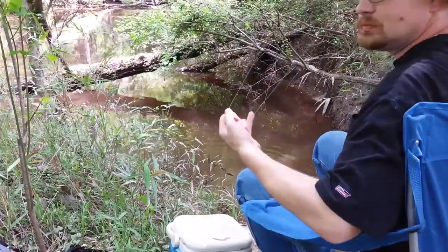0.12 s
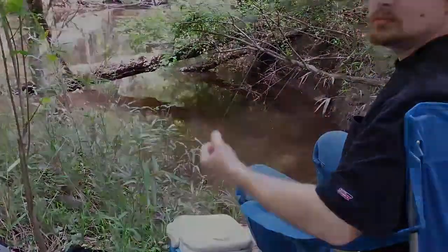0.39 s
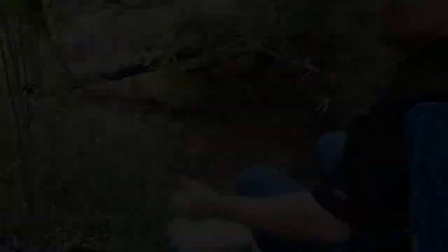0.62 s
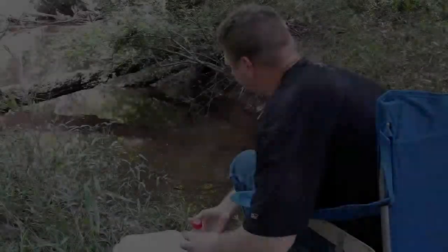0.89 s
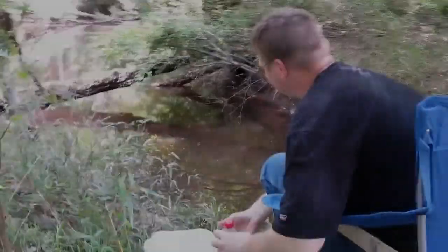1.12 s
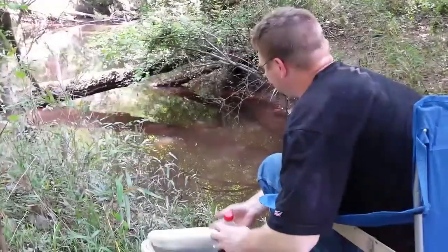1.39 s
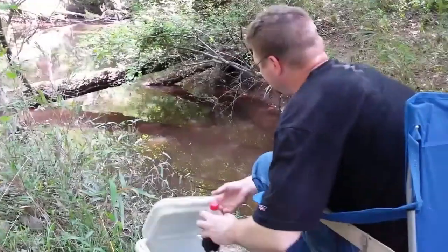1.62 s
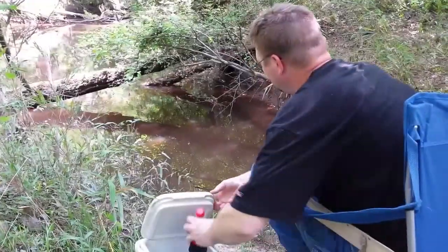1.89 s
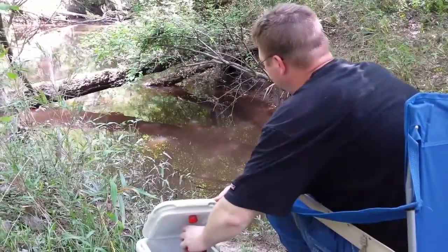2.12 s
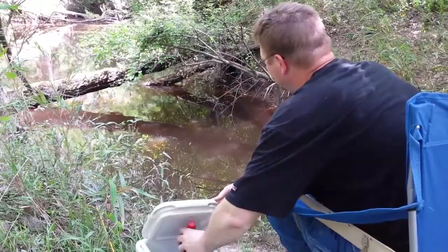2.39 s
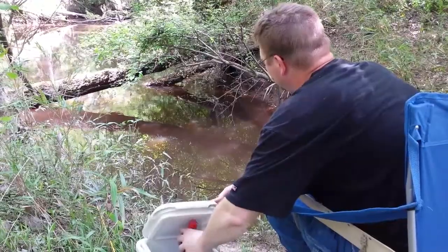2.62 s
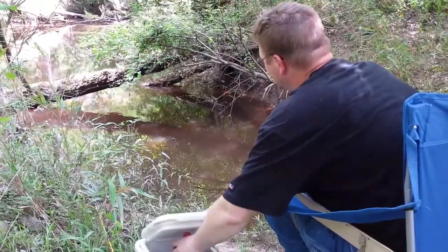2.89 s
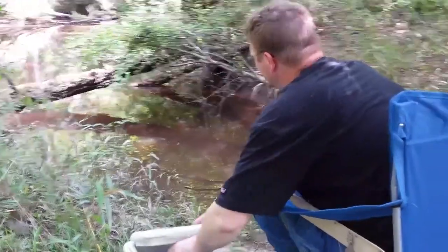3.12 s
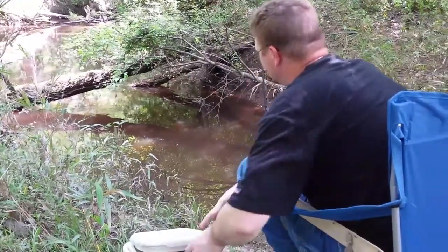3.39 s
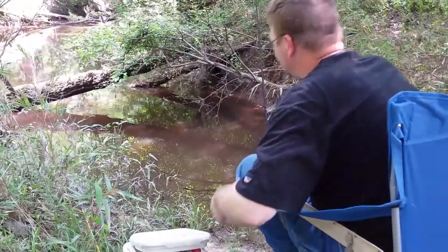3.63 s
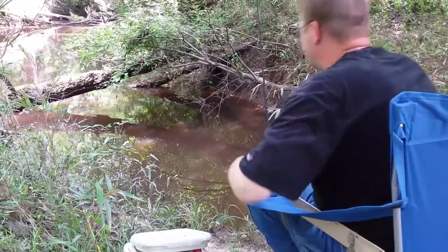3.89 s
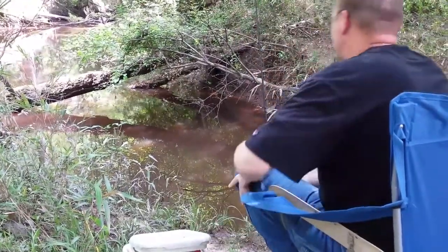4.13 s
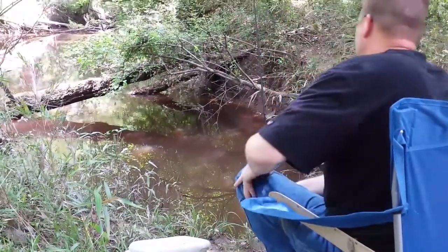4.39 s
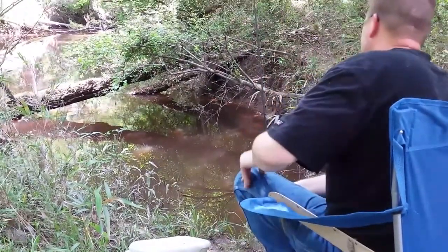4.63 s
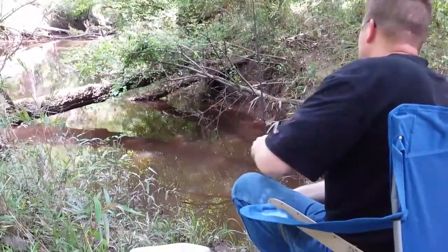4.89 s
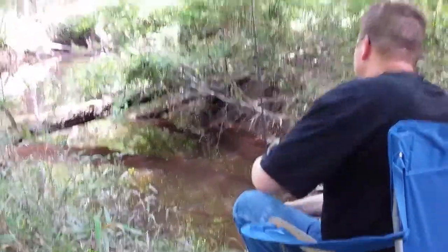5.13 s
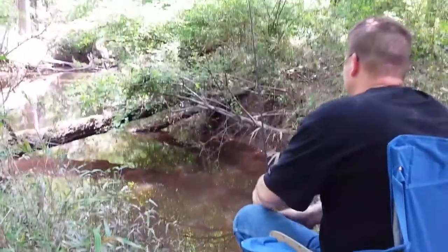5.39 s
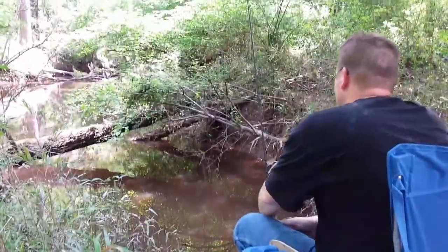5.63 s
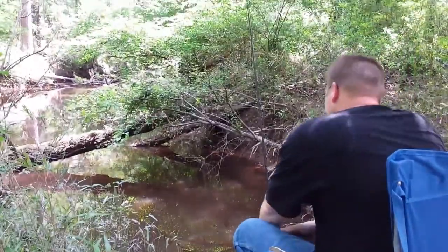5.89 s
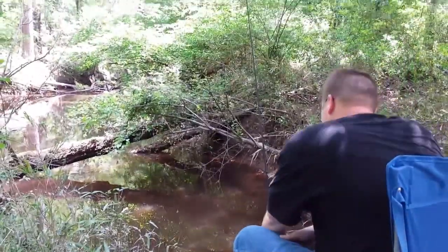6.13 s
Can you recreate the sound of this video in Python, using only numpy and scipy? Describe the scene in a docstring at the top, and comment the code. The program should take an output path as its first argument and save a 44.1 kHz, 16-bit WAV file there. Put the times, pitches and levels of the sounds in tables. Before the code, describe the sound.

Quiet woodland creek bank, heard close on a handheld microphone. Cloth hisses softly and a seat thumps dully, then a hand stirs loose tackle in a hard plastic box: sharp clacks, rattling, bright jingle and loud snaps as the lid closes. Afterwards fabric rustles, a bird gives quick sliding chirps echoing among trees, and soft finger bumps patter against the microphone.

```python
"""Tackle box on a creek bank

In the woods a seated angler rummages in a plastic tackle box and snaps it shut: short bursts of pushes ring its parts.
Cloth slides on a folding chair (shaped noise), the seat thumps and fingers knock on the handheld camera (ringing modes).
A bird sings quick glides (gliding sine tones) that ring among the trees (scattered, fading echoes).
Under it all lie the air of the woods, a low rumble (both noise) and a faint wavering hum (a drifting sine)."""
import sys
import numpy as np
from scipy import signal
from scipy.fft import rfft, irfft
from scipy.io import wavfile
from scipy.ndimage import uniform_filter1d

SR = 44100
rng = np.random.default_rng(int(sys.argv[2]) if len(sys.argv) > 2 else 0)


def output_pcm(signal):
    """Save a mono or channel-first signal as 16-bit PCM at the path in sys.argv[1].

    Samples are clipped to [-1, 1] before scaling.
    """
    pcm = np.clip(np.atleast_2d(signal).T, -1, 1) * 32767
    wavfile.write(sys.argv[1], SR, np.round(pcm).astype(np.int16))


def undo_db(level):
    """Turn decibels back into plain size, where 20 dB means ten times bigger."""
    steps = np.asarray(level, float) / 20
    return 10 ** steps


N = 276066  # samples in the scene


def evened(x):
    """Scales a sound to an rms of 1."""
    return x / np.sqrt(np.mean(x ** 2) + 1e-20)


def read(points, hz):
    """Reads a table of values over pitch, on a log-frequency axis."""
    f, value = np.transpose(points)
    return np.interp(np.log(hz + 1), np.log(f + 1), value)


def curve(rows):
    """Joins timed rows with straight lines: one array of samples per column."""
    s, *columns = np.transpose(rows)
    return [np.interp(np.arange(N) / SR, s, column) for column in columns]


# how alike noise is at the two microphone ports: f/Hz, likeness (1 = same, 0 = unrelated)
LIKENESS = [(60, 0.54), (180, 0.89), (550, 0.31), (1650, 0.019), (4970, 0.084), (15000, -0.2)]


def noise(shape, patchy_db):
    """Two-port noise of a given spectrum, with patches that drift in time and pitch."""
    frames, hz = N // 256 + 5, np.fft.rfftfreq(1024, 1 / SR)
    a, b, c, d, patches = rng.standard_normal((frames, 513, 5)).T
    patches = uniform_filter1d(patches, size=10, axis=0)
    patches = evened(uniform_filter1d(patches, size=8, axis=1))
    same = np.clip(read(LIKENESS, hz), -1, 1)[:, None]
    left = a + 1j * b
    right = same * left + np.sqrt(1 - same ** 2) * (c + 1j * d)
    spectrum = np.array([left, right]) * undo_db(read(shape, hz)[:, None] + patchy_db * patches)
    return evened(signal.istft(spectrum, nperseg=1024, noverlap=768)[1][:, :N])


def ring(pushes, modes):
    """Each mode, a sine that dies away, rings to its own train of pushes."""
    t = np.arange(6000) / SR
    out = np.zeros(pushes.shape[1])
    for push, (hz, db, t60) in zip(pushes, modes):
        tone = undo_db(db - 60 * t / t60) * np.sin(2 * np.pi * hz * t)
        out += signal.oaconvolve(push, tone)[:len(out)]
    return out


def struck(times, dbs, chatters, modes, rise):
    """A blow is dying contact chatter that gives each mode its share; soft contacts rise slowly."""
    out, t = np.zeros((len(modes), N + 2000)), np.arange(2000) / SR
    draws = rng.standard_normal((len(times), len(modes), 2000))
    hz, _, t60 = np.transpose(modes)[:, :, None]
    soft = int(rise * SR)
    for s, db, chatter, draw in zip(times, dbs, chatters, draws):
        burst = draw * np.exp(-t / max(chatter, 1e-4))
        burst = uniform_filter1d(burst, 1 + soft, origin=soft // 2, mode="constant")
        # how far the burst swings each mode
        turning = burst * undo_db(60 * t / t60) * np.exp(-2j * np.pi * hz * t)
        swing = abs(np.cumsum(turning, 1)) * undo_db(-60 * t / t60)
        burst /= swing.max(1, keepdims=True)  # every mode reaches its usual height
        peak = abs(ring(np.pad(burst, ((0, 0), (0, 500))), modes)).max()
        out[:, round(s * SR):][:, :2000] += undo_db(db) * burst / peak
    return ring(out[:, :N], modes)


def contacts(per_s, spread_db):
    """Contacts at random moments, many small and a few large."""
    sizes = undo_db(spread_db * np.minimum(rng.exponential(1, N), 4))
    return (rng.random(N) < per_s / SR) * sizes


def rattle(modes, per_s, spread_db, detune):
    """Loose contacts at four spots, each ringing a little off the others and dying sooner than a blow."""
    out = np.zeros(N)
    for shift in np.linspace(-1, 1, 4):
        hits = contacts(per_s, spread_db)
        spot = [(hz * (1 + detune * shift), db, 0.38 * t60) for hz, db, t60 in modes]
        out += ring(hits * rng.standard_normal((len(modes), N)), spot)
    return evened(out)


# how long echoes last among the trees: f/Hz, t60/s
TREE_ECHO = [(200, 0.058), (1500, 0.63), (4000, 0.68), (9000, 0.55)]


def trees(x):
    """Scattered echoes from trunks and bank, each band dying at its own speed."""
    taps = np.zeros((2, SR))
    at = np.arange(300, SR - 20, 20) + rng.integers(0, 20, (2, (SR - 301) // 20))
    np.put_along_axis(taps, at, rng.choice([-1., 1.], at.shape), 1)
    hz, t, z = signal.stft(taps, SR, nperseg=256)
    fade = undo_db(-60 * t / read(TREE_ECHO, hz)[:, None])
    tail = signal.istft(z * fade, SR, nperseg=256)[1]
    return signal.fftconvolve(x[None], tail / np.linalg.norm(tail[0]), axes=1)[:, :N]


def nearby(x, echo_db):
    """Ground, knees and chair give each port its own few early reflections."""
    taps = np.zeros((2, 500))
    np.put_along_axis(taps, rng.integers(20, 500, (2, 8)), rng.choice([-1., 1.], (2, 8)), 1)
    taps *= undo_db(echo_db - 12 * np.arange(500) / 500)  # later ones are softer
    return signal.oaconvolve(x[None], taps, axes=1)[:, :N]


def arrive(x, size):
    """The left port hears the sound this many samples late (early if negative)."""
    return np.array([np.roll(x, size), x])


def airborne(x, hz):
    """Small things radiate no deep bass: a high-pass filter."""
    return signal.sosfilt(signal.butter(3, hz, "high", fs=SR, output="sos"), x)


# tone colour of the air of the woods: f/Hz, level/dB (relative, per Hz)
WOODS_COLOUR = [(88, -19), (150, 1), (314, -4), (396, -22.5), (481, -19.5), (595, -14), (827, -13.5),
                (1700, -32), (2650, -9.5), (4480, -19), (12800, -19), (15500, -40.5)]


def woods():
    """The steady air of the woods: noise with strong drifting patches."""
    return undo_db(-70.5) * noise(WOODS_COLOUR, patchy_db=7.5)


# breeze and the holder's grip rumbling in the microphone: t/s, level/dB
RUMBLE_LEVEL = [(0.0, -63), (1.39, -61), (1.78, -66.5), (2.04, -66.5), (2.3, -53), (2.79, -60), (3.03, -56),
                (3.31, -52), (3.71, -63.5), (4.29, -65), (4.83, -58), (5.18, -54.5), (5.51, -61.5),
                (5.82, -62), (6.26, -64.5)]
# tone colour of that rumble: f/Hz, level/dB (relative, per Hz)
RUMBLE_COLOUR = [(20, -38), (40, -23), (80, 2.5), (130, -2), (200, -19.5), (350, -29.5)]


def rumble():
    """Breeze and grip shake the microphone: low noise that swells and sinks."""
    return undo_db(curve(RUMBLE_LEVEL)[0]) * noise(RUMBLE_COLOUR, patchy_db=-1.0)


# hiss of sliding cloth: t/s, level/dB
CLOTH_LEVEL = [(0.0, -67), (0.14, -65.5), (0.3, -58.5), (0.46, -57), (0.68, -61), (1.03, -58.5),
               (1.29, -63), (2.1, -73), (3.45, -64.5), (3.6, -71), (4.07, -74), (4.35, -65.5),
               (4.65, -56.5), (4.87, -62), (5.43, -60.5), (5.7, -70), (5.86, -61.5), (6.26, -74)]
# tone colour of the hiss: f/Hz, level/dB (relative, per Hz)
HISS_COLOUR = [(1470, -39.5), (2500, -15.5), (4330, -9), (5160, -9), (6490, -3.5), (9800, -14),
               (13900, -28.5), (14800, -26.5), (15500, -51)]
# tone colour of the duller drag: f/Hz, level/dB (relative, per Hz)
DRAG_COLOUR = [(88, -45), (150, -3.5), (475, -2), (516, -5.5), (595, -6), (2500, -12.5), (3250, -53),
               (5500, -120)]


def cloth():
    """Sliding fabric: noisy hiss, and a duller drag that follows it less steeply."""
    hiss_db = curve(CLOTH_LEVEL)[0]
    drag_db = -65.5 + 0.63 * (hiss_db + 60.5)  # 0.63 dB of drag per dB of hiss
    hiss = undo_db(hiss_db) * noise(HISS_COLOUR, patchy_db=1.5)
    return hiss + undo_db(drag_db) * noise(DRAG_COLOUR, patchy_db=3.0)


# blows on the box: t/s, body level/dB, tilt from wall to rim/dB, crack level/dB, contact chatter/s
# (blows() adjusts levels and chatter for each part)
BOX_BLOWS = [(0.0568, -58.5, -4, -65, 0.016), (0.3704, -62.5, -1.5, -46, 0.01),
             (0.7641, -64, 0, -44, 0.0039), (1.454, -54.5, -1, -49, 0.012),
             (2.1287, -43, -6.5, -41, 0.0064), (2.144, -38.5, -3, -37, 0.0084),
             (2.1744, -45.5, 4.3, -45, 0.012), (2.2325, -22, 0, -19, 0.0084),
             (2.2676, -41, -13, -36.5, 0.00067), (2.4167, -51.5, -11.5, -53, 0.0043),
             (2.726, -76, -5.5, -37.5, 0.0067), (2.7402, -44, 2.5, -35, 0.0039),
             (2.7562, -64, -3, -42.5, 0.0022), (2.8066, -24, 4, -24.5, 0.0061),
             (2.832, -43.5, -10.5, -25, 0.0097), (2.9186, -36.5, 11, -7, 0.0099),
             (2.9666, -37, 8.5, -9.5, 0.004), (2.9972, -42, 4.5, -36.5, 0.032),
             (3.086, -52.5, 5.5, -44.5, 0.0036), (3.1343, -33, 6.5, -27, 0.0018),
             (3.1443, -42, 3.5, -30.5, 0.0042), (3.1644, -23, 2, -9, 0.013), (3.33, -49, 12.5, -51, 0.017),
             (3.366, -48, 7, -29, 0.013), (3.3833, -53, -6.5, -53, 0.0041), (3.4092, -52, -14, -60, 0.0042),
             (3.477, -46, 3.5, -42.5, 0.0037), (3.8635, -75, 15, -57, 0.01),
             (5.4169, -51.5, 7, -34, 0.0042)]
# ringing of the box walls: f/Hz, level/dB (relative), t60/s
WALL_MODES = [(193.3, -5.5, 0.077), (263, -6.5, 0.17), (368, -2.5, 0.07), (447, -4.5, 0.12),
              (515, -9.5, 0.12)]
# ringing of the lid: f/Hz, level/dB (relative), t60/s
LID_MODES = [(680, -6, 0.055), (806, -0.5, 0.064), (956, 5, 0.025), (1145, 2.5, 0.029), (1315, -0.5, 0.027)]
# ringing of the rim: f/Hz, level/dB (relative), t60/s
RIM_MODES = [(1482, -9, 0.068), (1695, -9.5, 0.093), (1850, 5, 0.011), (1840, -1.5, 0.026),
             (2156, 0.5, 0.013), (2253, -2.5, 0.02), (2544, 0, 0.02), (2913, 1, 0.013), (3200, -10.5, 0.01),
             (3775, -10.5, .02)]
# bright ringing of the hard edges: f/Hz, level/dB (relative), t60/s
CRACK_MODES = [(4160, -18, 0.044), (4910, -12.5, 0.029), (5300, -6.5, 0.017), (5984, 9, 0.0053),
               (6540, 1, .008), (7200, -1.5, 0.014), (7895, 3, 0.016), (8390, -2, 0.0048),
               (9040, -12, .005), (10070, -19, .004), (13000, -32, .004)]


def blows():
    """Each blow rings walls, lid and rim, and its shorter chatter cracks the hard edges."""
    s, db, tilt_db, crack_db, chatter = np.transpose(BOX_BLOWS)
    body = struck(s, db - tilt_db + 2, chatter, WALL_MODES, rise=0)
    body += struck(s, db + 8, chatter, LID_MODES, rise=0)
    body += struck(s, db + tilt_db + 4, 0.83 * chatter, RIM_MODES, rise=0)
    crack = struck(s, crack_db, 0.11 * chatter, CRACK_MODES, rise=0)  # hard edges part first
    # the same crack, drawn again so the two ports differ
    crack_again = struck(s, crack_db, 0.11 * chatter, CRACK_MODES, rise=0)
    return body, crack, crack_again


# tone colour of hooks and sinkers clicking: f/Hz, level/dB (relative, per Hz)
TACKLE_COLOUR = [(1650, -36), (2800, -11.5), (4480, -11), (5850, -6), (7130, -8.5), (8370, -11),
                 (11600, -35.5), (12000, -54), (15000, -71.5)]


def jingle(per_s, spread_db, t60):
    """Tiny bright clicks: noise let through in short dying bursts."""
    gate = signal.oaconvolve(contacts(per_s, spread_db), undo_db(-60 * np.arange(2000) / SR / t60))[:N]
    return evened(gate * noise(TACKLE_COLOUR, patchy_db=1))


# a hand stirring tackle in the box: t/s, wall rattle level/dB, tackle jingle level/dB
STIR_LEVEL = [(2.122, -76.5, -67.5), (2.135, -55, -49), (2.3, -50, -57), (2.46, -48.5, -56),
              (2.7, -67.5, -68.5), (2.79, -57, -60.5), (2.91, -55.5, -55), (2.93, -35.5, -34),
              (3.04, -46.5, -48.5), (3.12, -48, -54), (3.2, -44.5, -50.5), (3.26, -53.5, -51),
              (3.35, -44.5, -49.5), (3.44, -59, -60.5), (3.51, -71, -70)]


def stirring():
    """Loose tackle rattles walls and lid, scrapes the rim and jingles."""
    wall_db, jingle_db = curve(STIR_LEVEL)
    start, end = STIR_LEVEL[0][0], STIR_LEVEL[-1][0]
    inside = np.interp(np.arange(N) / SR, [start - 0.005, start, end, end + 0.031], [0, 1, 1, 0])
    stir = undo_db(wall_db) * rattle(WALL_MODES + LID_MODES, per_s=260, spread_db=3.5, detune=0.066)
    # the same tackle that jingles scrapes the rim, a little softer
    stir += undo_db(jingle_db - 2.5) * rattle(RIM_MODES, per_s=150, spread_db=2.5, detune=0.045)
    return inside * stir, inside * undo_db(jingle_db) * jingle(per_s=4700, spread_db=9.0, t60=0.023)


def box():
    """Blows and loose tackle ring the box, with reflections close by and echoes from the trees."""
    body, crack, crack_again = blows()
    stir, clicks = stirring()
    body = airborne(body + stir, hz=137.6)
    near = arrive(body + crack, size=3)
    near += nearby(crack, echo_db=-10) + nearby(body, echo_db=-16.5)
    near += arrive(crack_again, size=-2)  # reaches the left port slightly early
    return near + undo_db(-20.0) * trees(body + crack) + clicks


# a faint wavering hum: t/s, level/dB
HUM_LEVEL = [(.15, -86), (.3, -71.5), (.8, -72), (1.0, -90)]


def hum():
    """A thin sine near 525 Hz whose pitch drifts by about 8 Hz."""
    drift = evened(uniform_filter1d(rng.standard_normal(N), size=2000))
    return undo_db(curve(HUM_LEVEL)[0]) * np.sin(2 * np.pi * np.cumsum(525 + 8 * drift) / SR)


def whistle(dry, start, hz, db):
    """Adds one near-sine note, with a warble of pitch and loudness that grows along it."""
    t = np.arange(len(hz)) / SR
    warble = np.cos(2 * np.pi * 66 * t) * np.clip(t / 0.084 - 0.3, 0, 1)  # 66 Hz, none in the first 25 ms
    tone = np.sin(2 * np.pi * np.cumsum(hz * (1 + 0.023 * warble)) / SR)
    tone *= signal.windows.tukey(len(t), 0.3)  # share of the note spent swelling and fading
    note = undo_db(db) * (1 - 0.84 * warble) * tone
    first = round(start * SR)
    return dry + np.pad(note, (first, N - first - len(t)))


# plain glides and held whistles: start t/s, length/s, from f/Hz, to f/Hz, level/dB
PLAIN_GLIDES = [(.68, 0.039, 4730, 4630, -64.5), (0.719, .14, 4660, 4620, -73),
                (0.872, .15, 5370, 5260, -61.5), (1.09, 0.01, 2170, 2060, -63),
                (4.286, 0.0096, 5270, 4500, -64), (4.292, 0.028, 3570, 2710, -56),
                (5.257, 0.017, 6610, 3200, -38.5), (5.273, .012, 3200, 1700, -57)]
# falls that level off on their last pitch: start t/s, length/s, from f/Hz, to f/Hz, level at the end/dB
LEVELLING_FALLS = [(4.445, .026, 7500, 4860, -39), (4.798, 0.053, 5560, 2910, -37)]
# notes that shoot up and droop: start t/s, length/s, from f/Hz, top f/Hz, level/dB
HOOKED_NOTES = [(.185, .028, 2880, 3280, -64), (4.56, 0.0288, 2430, 4050, -49.5),
                (4.601, .03, 2154, 3940, -46.5), (4.645, 0.039, 3200, 3600, -69),
                (4.681, 0.067, 1680, 2155, -53), (4.791, 0.0125, 4000, 5230, -38)]
# the one long whistle, up and over: t/s, f/Hz, level/dB
LONG_WHISTLE = [(4.912, 1644, -43), (4.94, 2100, -50.5), (4.975, 2400, -48.5), (4.995, 2670, -45),
                (5.016, 3160, -53), (5.05, 2920, -52), (5.101, 2502, -52.5), (5.15, 1997, -54.5),
                (5.18, 1750, -67)]


def bird():
    """Whistled glides with a quick warble, far enough off that the tree echoes are strong."""
    dry = np.zeros(N)
    for start, length, from_hz, to_hz, db in PLAIN_GLIDES:
        dry = whistle(dry, start, np.geomspace(from_hz, to_hz, round(length * SR)), db)
    for start, length, from_hz, to_hz, db in LEVELLING_FALLS:
        left = np.linspace(1, 0, round(length * SR))
        hz = to_hz + (from_hz - to_hz) * left ** 2.1  # power 1 would be a straight fall
        dry = whistle(dry, start, hz, db - 3.5 * left ** 2)  # starts 3.5 dB softer and swells
    for start, length, from_hz, top_hz, db in HOOKED_NOTES:
        u = np.linspace(0, 1, round(length * SR))
        hz = top_hz - (top_hz - from_hz) * (1 - u / 0.54) ** 2  # tops out 0.54 of the way along
        dry = whistle(dry, start, hz, db)
    s, hz, db = np.transpose(LONG_WHISTLE)
    t = np.arange(s[0], s[-1], 1 / SR)
    dry = whistle(dry, s[0], np.interp(t, s, hz), np.interp(t, s, db))
    return arrive(dry, size=18) + undo_db(-1.0) * trees(dry)


# the seat taking weight: t/s, level/dB
SEAT_THUMPS = [(1.432, -50), (1.456, -37)]
# ringing of the chair frame: f/Hz, level/dB (relative), t60/s
FRAME_MODES = [(195, 10, 0.054), (131, -15, .08)]


def chair():
    """Dull thumps in the folding chair: soft blows that ring its frame."""
    s, db = np.transpose(SEAT_THUMPS)
    return arrive(struck(s, db, np.full(len(s), 0.0067), FRAME_MODES, rise=0.00063), size=2)


# fingers on the camera shell: t/s, thud level/dB, tap level/dB (both before the lift in fingers())
FINGER_KNOCKS = [(2.305, -25.5, -37.5), (2.441, -24.5, -54), (2.468, -18, -25.5), (2.484, -23, -44),
                 (2.503, -36, -42), (2.521, -34, -34.5), (2.571, -26.5, -40), (4.699, -51, -58),
                 (5.019, -46, -86), (5.19, -43, -75), (5.213, -41, -69), (5.224, -31, -57),
                 (5.3, -36.5, -63), (5.311, -36.5, -59), (5.404, -45, -64), (5.451, -36, -51.5),
                 (5.46, -32.5, -63), (5.704, -43.5, -74), (5.74, -32, -53), (5.748, -34, -60),
                 (5.768, -31.5, -65), (5.783, -32.5, -52), (5.797, -36, -58), (5.886, -33, -50),
                 (5.941, -34, -48.5), (5.98, -53, -75), (6.103, -52, -71), (6.159, -50, -74),
                 (6.237, -51.5, -65)]
# low ringing of the shell: f/Hz, level/dB (relative), t60/s
THUD_MODES = [(134.8, -8.5, 0.15), (216.8, -8.5, 0.11), (329.5, -6.5, 0.11), (419, 4.5, 0.036),
              (721, -6, 0.024)]
# higher ringing of the shell: f/Hz, level/dB (relative), t60/s
TAP_MODES = [(1237, -5, 0.028), (1750, -18, 0.018)]


def fingers():
    """Knocks travel through the shell, mostly into the left port."""
    s, thud_db, tap_db = np.transpose(FINGER_KNOCKS)
    thud = struck(s, thud_db + 3.0, np.full(len(s), 0.0027), THUD_MODES, rise=0.00091)
    tap = struck(s, tap_db + 7.5, np.full(len(s), 0.0023), TAP_MODES, rise=0.0002)
    left = airborne(thud + tap, hz=96)
    right = undo_db(-22) * np.roll(left, 12) + nearby(left, echo_db=-14)[1]
    return np.array([left, right])


def scene():
    """Woods, rumble, cloth and hum, a little stronger on the left, under box, bird, chair and fingers."""
    soft = woods() + rumble() + cloth() + hum()
    return soft * undo_db(np.array([[0.8], [-0.8]])) + box() + bird() + chair() + fingers()


def band_limit(x):
    """A steep low-pass at the top of the band."""
    return signal.sosfilt(signal.butter(12, 16020, fs=SR, output="sos"), x)


# balance of the two microphone ports: f/Hz, left minus right level/dB
PORT_BALANCE = [(60, -3), (180, 4), (550, 1), (1650, 1), (4970, 0), (15000, -9)]


def record(dry):
    """The ports differ in balance, the left duller at the top; then a steep low-pass acts near 15 kHz."""
    hz = np.fft.rfftfreq(N, 1 / SR)
    half_db = read(PORT_BALANCE, hz) / 2
    low_pass_db = -40 * np.clip((hz - 14600) / 900, 0, 1)  # falls 40 dB from 14600 to 15500 Hz
    gain = undo_db(np.array([half_db, -half_db]) + low_pass_db)
    mix = irfft(rfft(dry, axis=1) * gain, N, axis=1)
    return band_limit(mix)


dry = scene()
out = record(dry)
output_pcm(out)
```